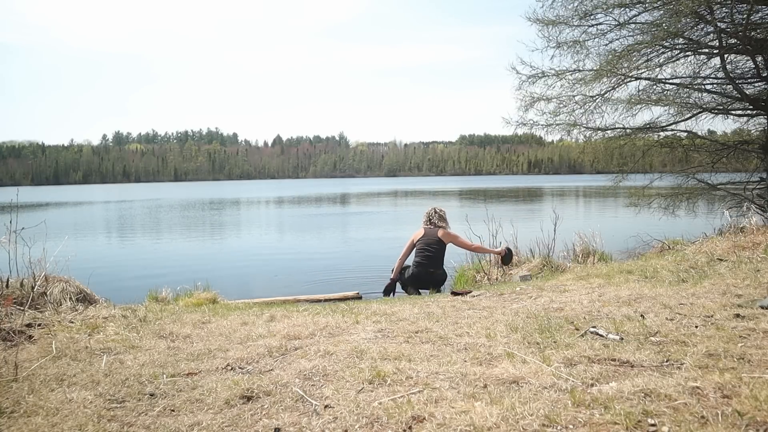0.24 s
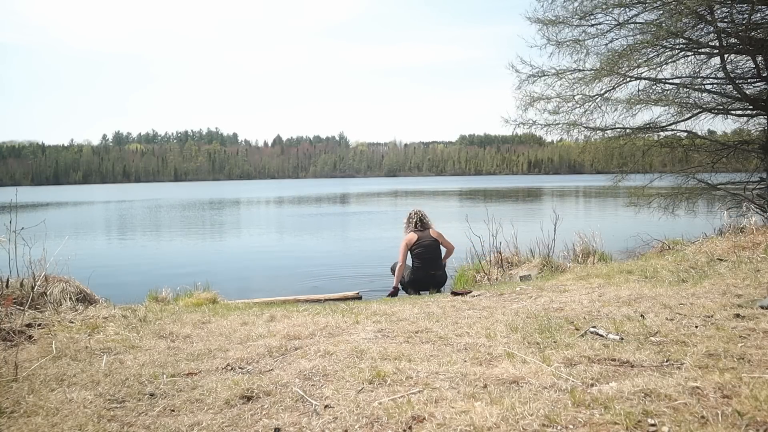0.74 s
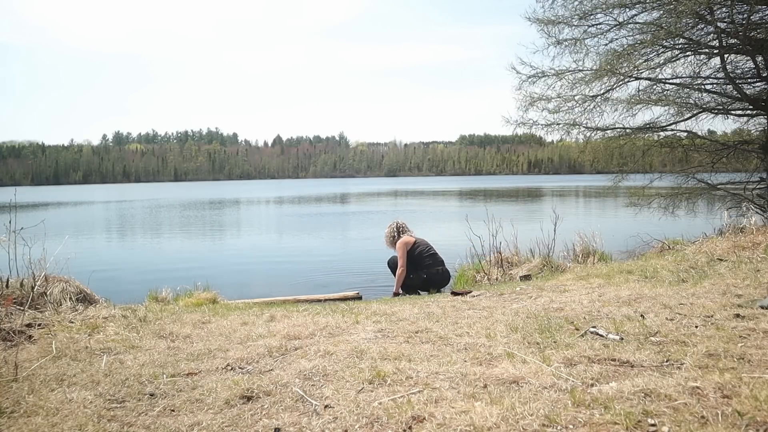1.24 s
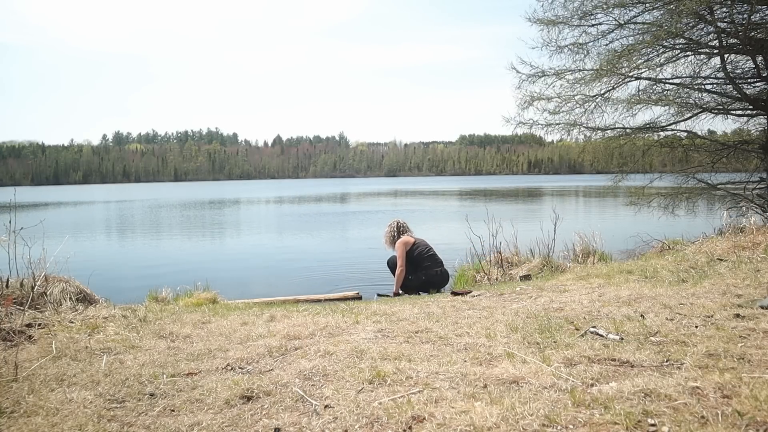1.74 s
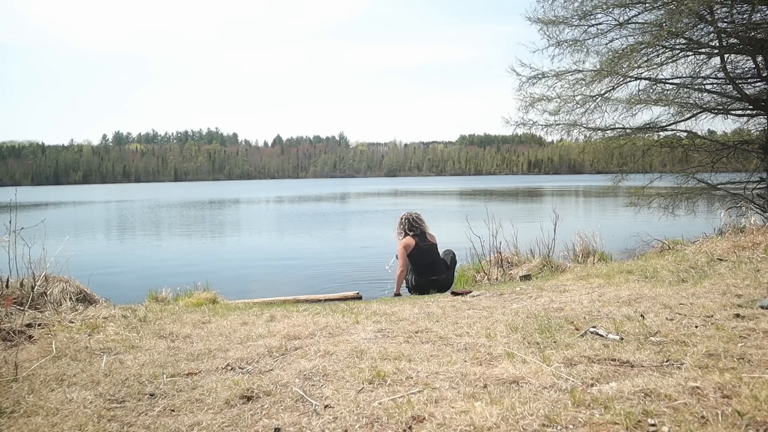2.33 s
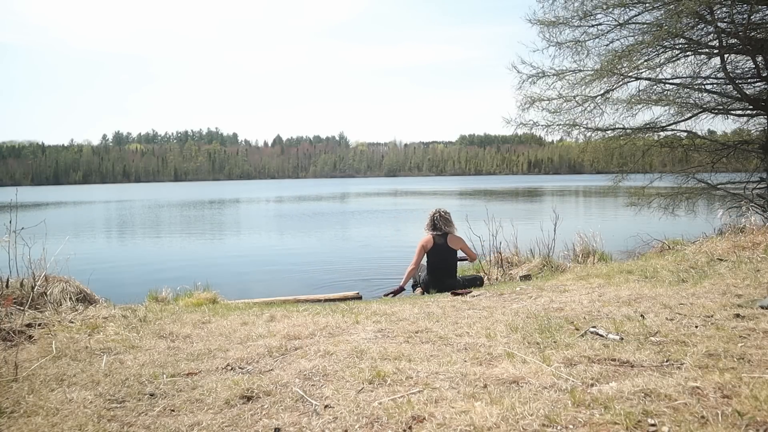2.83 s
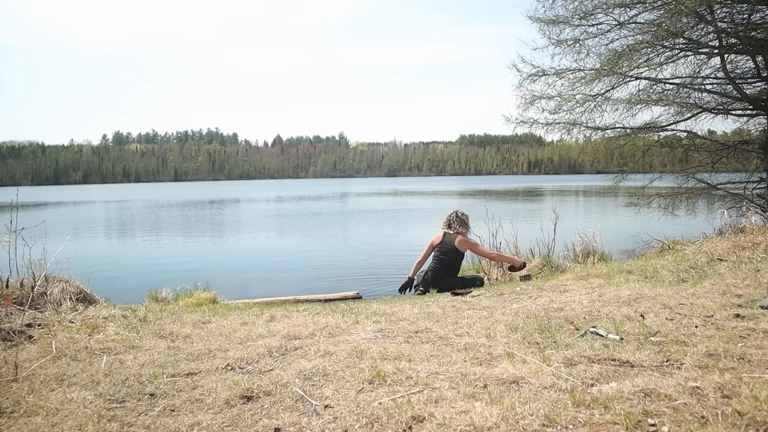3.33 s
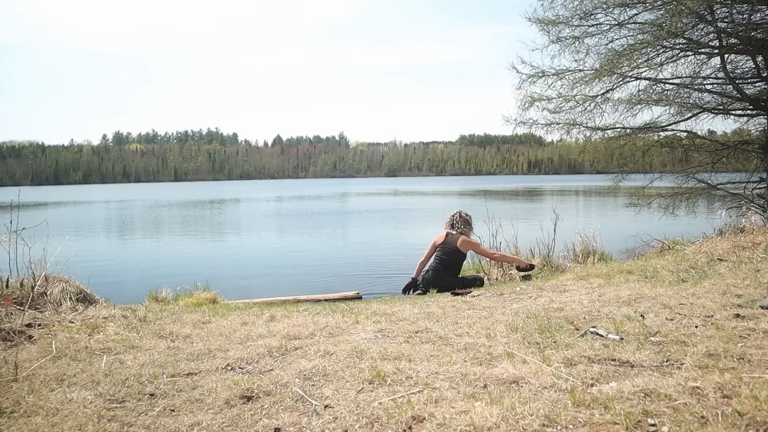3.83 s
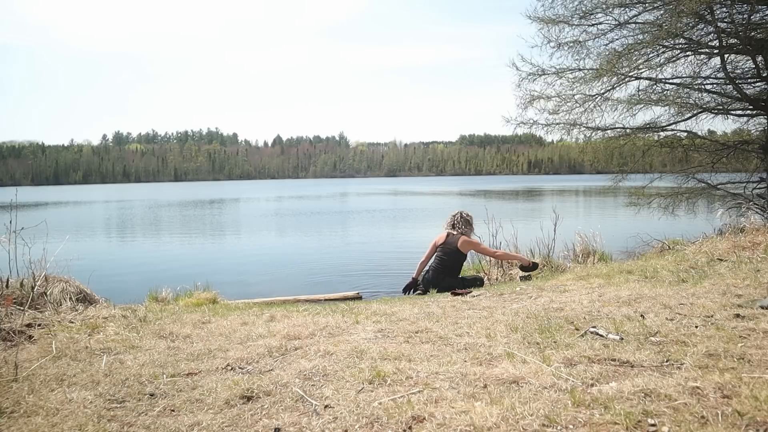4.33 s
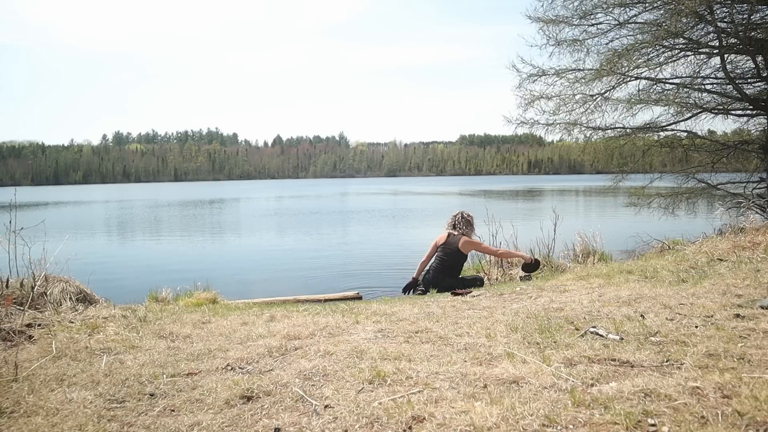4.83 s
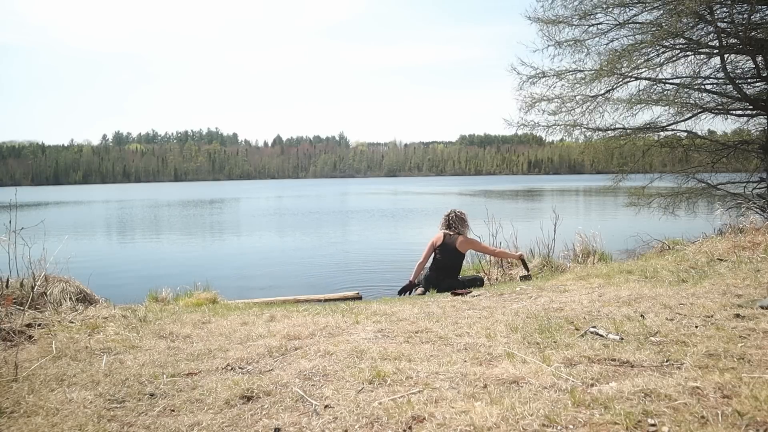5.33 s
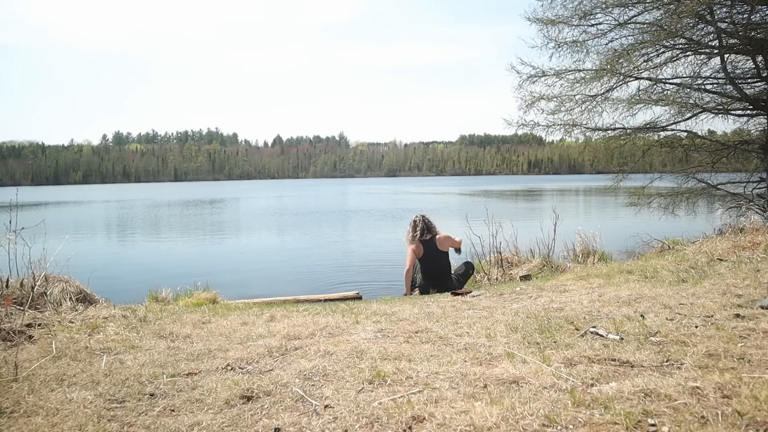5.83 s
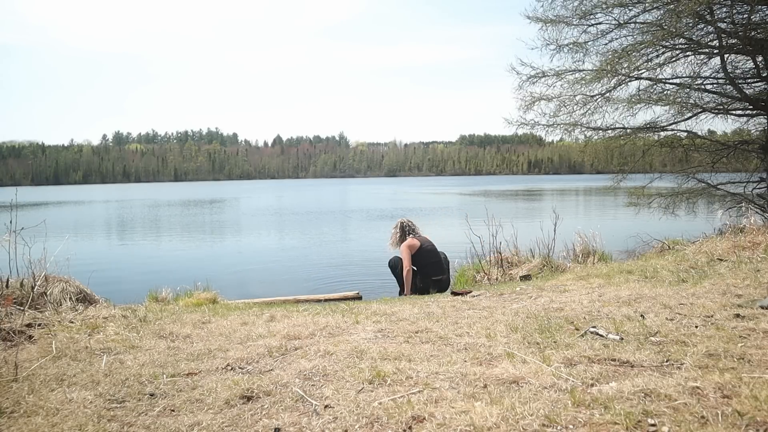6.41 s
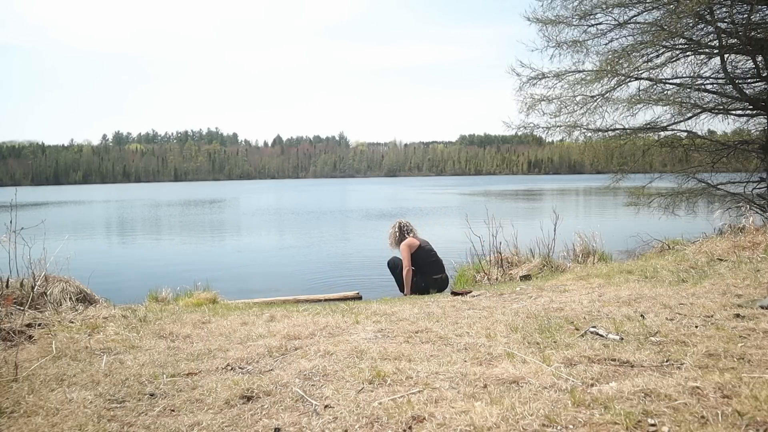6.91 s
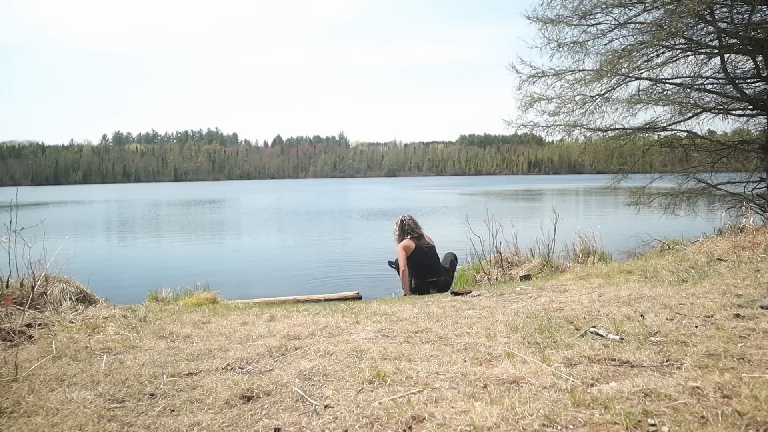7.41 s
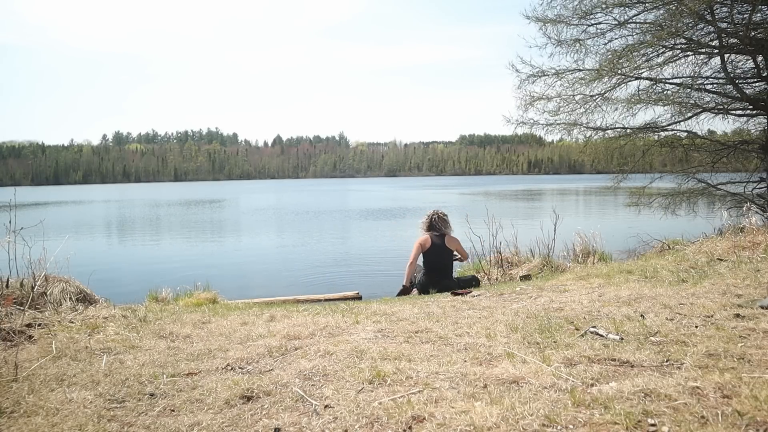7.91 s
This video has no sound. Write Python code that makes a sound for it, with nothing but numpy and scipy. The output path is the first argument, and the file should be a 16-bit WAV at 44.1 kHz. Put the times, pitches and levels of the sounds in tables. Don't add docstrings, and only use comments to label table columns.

```python
import sys
import numpy as np
from scipy import signal
from scipy.fft import rfft, irfft
from scipy.io import wavfile
from scipy.ndimage import uniform_filter1d

SR = 44100
rng = np.random.default_rng(int(sys.argv[2]) if len(sys.argv) > 2 else 0)


def generate_wav(sig):
    pcm = np.round(np.clip(np.atleast_2d(sig).T, -1, 1) * 32767).astype(np.int16)
    wavfile.write(sys.argv[1], SR, pcm)


def elevation(decibels):
    levels = np.asarray(decibels, float)
    return 10 ** (levels / 20)


N = 359855

# time in seconds, chorus level in dB, chorus centre in Hz,
# pulses per second of the near toad, near toad level in dB.
CHORUS = [(0.0, -32, 1739, 56, -5), (0.59, -34, 1737, 53.3, -4.5), (1.3, -34.5, 1722, 56.5, -4.5),
          (1.55, -33, 1726, 55.3, -4), (2.41, -33.5, 1679, 53.5, -2), (2.9, -34, 1697, 53.3, -5),
          (3.82, -33, 1689, 54, -4.5), (4.1, -34, 1699, 51.3, -4), (4.55, -33.5, 1688, 55, -3.5),
          (5.41, -37.5, 1720, 55.7, -2.5), (6.8, -36.5, 1692, 55.4, 0), (7.9, -37.5, 1702, 54.5, 0.2),
          (8.02, -41.5, 1722, 51, 1), (8.16, -37, 1726, 51, -1)]
# time in seconds, level in dB.
DEEP_TOAD = [
    (0, -59),
    (5.7, -47),
    (5.85, -14),
    (6.8, -16.5),
    (7.6, -13),
    (8.16, -11),
]
CROWD = [(.905, 51.16), (.93, 54.52), (.95, 57.38), (.98, 53.05),
         (1.005, 56.48), (1.03, 51.94), (1.055, 58.92), (1.075, 50.05)]
# time in seconds, level in dB.
GUSTS = [(0.0, -47), (0.5, -46), (0.93, -54), (1.2, -49), (1.4, -42.5), (1.85, -38.5), (2.1, -41),
         (2.38, -42.5), (2.75, -37), (3.3, -44.5), (3.66, -64), (4.5, -66), (5.0, -52), (5.75, -45.5),
         (6.1, -40.5), (6.9, -35), (7.6, -33), (8.16, -31.5)]
# time in seconds, change in dB.
PUFFS = [(2.04, 4), (2.46, 6.5), (5.47, 6), (5.88, 5), (6.01, 3.5), (6.7, 6.5), (7.11, -3), (7.18, 5.5),
         (7.42, -4.5), (7.66, 3.5), (7.79, 3), (7.91, -10)]
# frequency in Hz, density in dB per Hz.
BUFFET_SPECTRUM = [(7.1, -27), (12, -0.5), (33, 1.5), (82, -5), (200, -18.5), (336, -34.5), (378, -35.5),
                   (420, -40.5), (550, -58), (920, -120)]
# frequency in Hz, density in dB per Hz.
AIR_SPECTRUM = [(71, -51), (120, -20), (294, -18.5), (450, -18.5), (552, -22), (1130, -26.5), (1730, -7),
                (1830, -10.5), (1990, -29), (2250, -33), (3660, -36), (12200, -40), (15500, -41)]
# peak in seconds, level in dB, seconds to fade 20 dB, # dull part in dB,
# dull resonance in Hz.
PUSHES = [(0.0, -47, 0.42, -4.5, 2840), (0.2, -55, 2.8, -0.7, 2900), (1.2, -65, 0.7, -1, 2930),
          (1.91, -67, .5, 7, 2600), (2.1, -65, 0.5, 2.5, 2600), (2.3, -60, 0.5, -1, 2650),
          (2.61, -62, 0.1, 0, 2520), (2.71, -66, 0.6, 14, 2490), (2.85, -66, 0, 2.5, 2600),
          (3.13, -57, 0.24, -4, 2990), (3.45, -65, 1, -2.5, 2950), (3.6, -46.5, 0.26, -6, 3400),
          (3.67, -50.5, 0.2, -2, 3600), (3.75, -56, .4, -2, 3500), (3.82, -46, 0.34, -6, 3700),
          (3.89, -42, 0.33, -4.5, 3600), (4.2, -52.5, 1.55, 0.8, 3800), (4.46, -52.5, .9, -4, 3500),
          (4.6, -47, .3, 1, 2600), (4.72, -51.5, .45, 2.5, 2480), (4.86, -57.5, 0.2, 10.5, 2350),
          (4.96, -55.5, 0, -2.5, 2388)]
# time in seconds, frequency in Hz.
BRIGHT = [(0, 8100), (3.55, 8100), (3.7, 8300), (3.86, 8500), (4.03, 7100), (4.3, 7200), (4.45, 7500),
          (4.6, 7700), (4.9, 7000)]
# time in seconds, frequency in Hz, level in dB.
MIDDLE = [
    (3.95, 5300, -18),
    (4.12, 5350, 1),
    (4.4, 5400, -6),
    (4.55, 6003, -9),
    (4.7, 6100, -2),
    (4.85, 6000, -20),
]
# seconds at which it opens, is full, begins to close, is shut.
GAP_S = (3.9, 4.05, 4.75, 4.9)
# time in seconds, added level in dB.
LOW_BOOST = [(1.9, 8), (2.1, 1), (3.5, 0.2), (3.7, 2.4), (4.3, 2.5), (4.5, 0.5)]
# time in seconds, peak in dB.
TICKS = [(0.0792, -34), (1.236, -39), (1.798, -44), (2.1281, -45), (2.15, -42.5), (2.3371, -42),
         (2.4264, -44.5), (2.4768, -45), (2.5227, -48), (2.572, -41), (2.9662, -47), (3.0021, -48),
         (3.235, -48), (3.3326, -49), (2.616, -41), (2.6509, -43), (2.6831, -40), (2.832, -46.5),
         (3.0325, -45), (3.1148, -43), (3.3024, -45), (3.4544, -44), (3.5627, -46), (3.6391, -36),
         (3.6681, -34), (3.679, -38), (3.718, -41), (3.758, -42), (3.797, -34), (4.2018, -40),
         (4.4298, -38), (4.8214, -46), (4.9496, -46), (4.8635, -41.5), (6.0152, -46), (6.0355, -44),
         (6.0939, -43), (7.378, -45.5)]
# seconds at which they begin, are full, begin to fade, end.
STRAY_S = (1.9, 2.1, 3.45, 3.55)
# time in seconds, peak in dB.
RASP = [(0.7942, -34.5), (0.878, -37), (0.9244, -41), (0.9454, -34.5), (1.0469, -39), (1.0761, -40),
        (1.0911, -37), (1.1265, -39), (1.1669, -39), (1.2332, -37.5), (1.2736, -42.5), (1.3051, -43),
        (1.3574, -41), (1.4178, -39.5), (1.43, -35.5), (1.5076, -38)]
# time in seconds, level in dB, start in Hz, end in Hz, length in seconds.
BUBBLES = [(.783, -43, 560, 640, .007), (.784, -46, 390, 420, .01), (1.223, -48, 319, 430, 0.041),
           (1.688, -48, 720, 950, .014), (2.028, -44, 1050, 1250, .008), (2.656, -44, 700, 760, .012),
           (7.243, -46, 700, 740, .01), (6.846, -42, 1020, 1270, .02), (1.361, -45, 207, 262, .04),
           (1.425, -42.5, 640, 720, .014), (1.5, -47, 600, 800, .03), (1.575, -46.5, 760, 900, .011),
           (1.748, -40, 960, 680, 0.019), (1.846, -40.5, 400, 540, .026), (1.865, -38, 520, 630, .026),
           (2.089, -44, 950, 1103, .007), (2.654, -38.5, 960, 1120, 0.01), (2.699, -48, 810, 1100, .025),
           (2.719, -45, 1160, 1302, .033), (6.653, -50, 879, 920, 0.048), (6.655, -45, 440, 464, .018),
           (6.786, -48, 560, 480, .014), (6.796, -35.5, 440, 1230, .046), (6.80, -42, 355, 416, .029),
           (6.826, -41, 450, 950, .022), (7.152, -41, 198.2, 284.1, .046), (7.311, -46, 950, 1000, .006),
           (7.313, -37, 606, 660, 0.028), (7.329, -41, 660, 800, .016), (7.347, -39, 558, 595, .034),
           (7.375, -49, 760, 820, .012), (6.912, -47, 880, 905, .012), (6.915, -51, 560, 680, .025),
           (7.608, -39, 998, 1200, .011), (7.619, -41, 626, 701, .011), (7.69, -44, 1170, 1252, .013)]
# time in seconds, peak in dB, ring in Hz.
DRIPS = [(1.3663, -43, 2760), (1.8138, -42, 2680), (1.8476, -49, 2240), (1.9456, -43, 2491),
         (2.0379, -41, 3150), (2.244, -42, 2600), (2.5915, -38, 2310), (2.6217, -44, 2330),
         (2.7535, -38, 2399), (2.571, -50, 3300), (2.629, -44, 2700), (2.644, -44, 2400),
         (2.652, -40, 4100), (2.696, -42, 2400), (2.702, -47, 4200), (2.7274, -43, 2650),
         (2.733, -46, 3200), (2.742, -40, 3620), (7.2376, -49, 3300), (7.2701, -45, 3900),
         (7.304, -47, 5000), (7.331, -49, 4300), (7.349, -50, 3430), (7.379, -49, 4890),
         (7.4317, -51, 3450), (7.5694, -50, 3600), (7.6352, -36, 5600), (7.667, -47, 3300),
         (7.676, -47, 3700), (7.692, -47, 3900), (7.725, -43, 2700), (7.754, -46, 2900),
         (7.7874, -48, 2400), (3.6002, -52, 2819), (3.807, -41, 3430), (4.8486, -38, 2626),
         (4.865, -29, 2460), (5.0916, -45, 2380), (5.385, -48, 2579), (6.8014, -53, 2448),
         (6.9627, -36, 2240), (7.034, -51, 2590), (7.1601, -53, 3110), (7.2145, -51, 2244),
         (7.639, -34, 2446), (7.7129, -35, 2470)]
# start in seconds, peak in seconds, end in seconds, peak in dB.
SPLASHES = [
    (1.9, 1.942, 2.0, -53.5),
    (1.99, 2.03, 2.15, -60),
    (2.6, 2.7, 2.79, -52.5),
    (5.04, 5.1, 5.24, -60),
    (6.93, 6.961, 7.18, -61.5),
    (7.19, 7.3, 7.42, -58),
    (7.596, 7.66, 7.86, -55),
]
# start in seconds, peak in seconds, end in seconds, peak in dB.
TRICKLES = [
    (1.5, 1.92, 2.12, -55),
    (2.67, 2.71, 2.77, -54),
    (4.75, 4.86, 5.0, -46),
    (5.0, 5.25, 6.0, -51),
]
# frequency in Hz, level in dB, 60 dB decay time in seconds.
TWIG = [(3760, -19, 0.073), (4980, -8.5, 0.031), (7397, -6.5, 0.036), (8100, -6, 0.066), (8750, 0, 0.018),
        (9383, -31, 5.0), (11600, -22, 0.048)]


def evened(x):
    return x / np.sqrt(np.mean(x ** 2) + 1e-20)


def curves(rows):
    s, *columns = np.transpose(rows)
    return [np.interp(np.arange(N) / SR, s, c) for c in columns]


def add(mix, s, sound):
    part = mix[round(s * SR):][:len(sound)]
    part += sound[:len(part)]


def band(x, low_hz, high_hz, order=2):
    return signal.sosfilt(signal.butter(order, [low_hz, high_hz], "bandpass", fs=SR, output="sos"), x)


def coloured(points):
    f, db = np.transpose(points)
    hz = np.fft.rfftfreq(N, 1 / SR)
    gain = elevation(np.interp(np.log(hz + 1), np.log(f + 1), db))
    return irfft(rfft(rng.standard_normal(N)) * gain, N)


def wander(rate):
    knots = rng.standard_normal(4000)
    return np.interp(np.arange(N) * rate / SR, np.arange(len(knots)), knots)


def crackle(per_s, spread_db):
    size = elevation(spread_db * np.minimum(rng.exponential(1, N), 4)) * np.sign(rng.standard_normal(N))
    return evened(size * (rng.random(N) < per_s / SR))


def ring(hz, t60, rise=0.00056, size=900):
    t = np.arange(size) / SR
    return np.sin(2 * np.pi * hz * t) * elevation(-60 * t / t60) * np.minimum(t / rise, 1)


def trill(hz, per_s, duty, glide):
    place = (np.cumsum(per_s * (1 + .014 * wander(9))) / SR + rng.random()) % 1 - .5
    width = np.where(place < 0, 0.99 * duty, duty)
    pulse = np.exp(-.5 * (place / width) ** 2)
    pulse += 0.11 * np.exp(-.5 * ((place + duty) / 0.023) ** 2)
    pulse *= elevation(2.78 * wander(40))
    pitch = hz * (1 + glide * place + .016 * wander(45))
    return evened(pulse * np.sin(2 * np.pi * np.cumsum(pitch) / SR))


def shore_echo(x, t60):
    t = np.arange(SR // 2) / SR
    tail = rng.standard_normal(len(t)) * elevation(-60 * t / t60)
    return signal.fftconvolve(x, tail / np.linalg.norm(tail))[:N]


def toads():
    level_db, centre_hz, per_s, near_db = curves(CHORUS)
    steady = np.ones(N)
    high_db = -13.5 - 1.7 * np.arange(N) / SR + 1.2 * wander(2.52)
    near = elevation(near_db) * trill(1.015 * centre_hz, per_s, duty=0.12, glide=0.03)
    high = elevation(high_db) * trill(1880 * steady, 58 * steady, duty=0.13, glide=.05)
    deep = elevation(curves(DEEP_TOAD)[0]) * trill(1370 * steady, 52 * steady, duty=0.088, glide=0.15)
    crowd = np.zeros(N)
    for pitch, pace in CROWD:
        voice = trill(centre_hz * pitch, pace * steady, duty=0.13, glide=0.058)
        crowd += elevation(1.26 * wander(1.524)) * voice
    overtone = elevation(-30.5) * trill(2080 * steady, per_s, duty=0.1, glide=.05)
    direct = near + overtone + high + deep + elevation(-3) * evened(crowd)
    wet = direct + elevation(-10.5) * shore_echo(direct, t60=0.32)
    return elevation(level_db) * wet / np.sqrt(uniform_filter1d(wet ** 2, SR // 3))


def wind():
    t = np.arange(N) / SR
    puff_s = 0.036
    gust_db = curves(GUSTS)[0]
    for s, db in PUFFS:
        gust_db += db * np.exp(-.5 * ((t - s) / puff_s) ** 2)
    buffet = evened(coloured(BUFFET_SPECTRUM))
    deepest = signal.sosfiltfilt(signal.butter(2, 45, fs=SR, output="sos"), buffet)
    lull = elevation(1.3 * np.minimum(gust_db + 46, 0))
    upper = np.clip((gust_db + 38) / 25, 0, 0.22) * band(buffet, 112, 270)
    return elevation(gust_db + 0.54 * wander(18)) * (buffet - (1 - lull) * deepest + upper)


def air():
    x = coloured(AIR_SPECTRUM)
    return elevation(-54) * x / np.std(band(x, 2158, 18000, order=4))


def pushes(t):
    s, db, fade_s, dull_db, dull_hz = np.transpose(PUSHES)[:, :, None]
    rise_share = 0.32
    away = np.where(t < s, (s - t) / rise_share, t - s)
    power = elevation(db - 20 * away / fade_s) ** 2 + 1e-20
    total = power.sum(0)
    return 10 * np.log10(total), (power * dull_db).sum(0) / total, (power * dull_hz).sum(0) / total


def cloth():
    rub = rng.standard_normal(N) + 0.36 * crackle(1500, spread_db=3.5)
    hz, t, z = signal.stft(rub, SR, nperseg=512, noverlap=384)
    hz = hz[:, None]

    def hump(centre_hz, width_hz):
        return np.exp(-.5 * ((hz - centre_hz) / width_hz) ** 2)

    level_db, dull_db, dull_hz = pushes(t)
    thin_db = -3.5 - 0.31 * dull_db - np.interp(t, [4.6, 4.8], [0, 5])
    low_db = 0.75 + 0.69 * dull_db + np.interp(t, *np.transpose(LOW_BOOST))
    bright_hz = np.interp(t, *np.transpose(BRIGHT))
    s, middle_hz, middle_db = np.transpose(MIDDLE)

    edge_hz = np.interp(t, [3.95, 4.1, 4.5, 4.65], [9770, 10500, 10300, 9600])
    under_edge = 1 / (1 + np.exp((hz - edge_hz) / 200))
    bright = (0.37 * hump(bright_hz, 1050) + 0.54 * hump(8100, 5200)) * (0.47 + under_edge)
    under_dull_edge = 1 / (1 + np.exp((hz - dull_hz - 700) / 120))
    dull = (0.56 * hump(dull_hz, 690) + 0.68 * hump(2700, 3200)) * (0.94 + under_dull_edge)
    dull = elevation(dull_db - 2.5) * dull
    thin = elevation(thin_db - 1) * hump(13800, 3800)
    low = elevation(low_db + 7) * hump(930, 560) * (hz > 200)
    middle = elevation(np.interp(t, s, middle_db)) * hump(np.interp(t, s, middle_hz), 350)
    gap = elevation(-4.5 * hump(4600, 220.3) * np.interp(t, GAP_S, [0, 1, 1, 0]))

    patches = rng.standard_normal((len(t), len(hz))).T
    patches = uniform_filter1d(patches, size=7, axis=0)
    patches = evened(uniform_filter1d(patches, size=22, axis=1))
    body = np.sqrt(bright ** 2 + dull ** 2 + thin ** 2 + low ** 2 + middle ** 2)
    shape = gap * body * elevation(level_db + 5 + patches)
    rustle = signal.istft(z * shape, SR, nperseg=512, noverlap=384)[1][:N]
    ending = np.clip((5.06 - np.arange(N) / SR) / 0.062, 0, 1)
    return rustle * elevation(0.8 * wander(40)) * ending


def ticks():
    out, t = np.zeros(N), np.arange(1500) / SR
    for s, db in TICKS:
        burst = rng.standard_normal(len(t)) * elevation(-60 * t / 0.017) * np.minimum(t / .0006, 1)
        bright = 2 * band(burst, 6500, 9400, order=1)
        dull = 2 * elevation(-19) * band(burst, 2200, 5500)
        add(out, s, elevation(db - 2.5) * (bright + dull))
    stray = crackle(25, spread_db=3) * np.interp(np.arange(N) / SR, STRAY_S, [0, 1, 1, 0])
    snap = band(burst, 6300, 11500, order=1)
    return out + elevation(-79.5) * signal.oaconvolve(stray, snap)[:N]


def insect():
    out = np.zeros(N)
    for (s, db), detune in zip(RASP, rng.uniform(-0.025, 0.022, len(RASP))):
        add(out, s, elevation(db - 1) * ring(5270 * (1 + detune), t60=0.015, rise=0.00046))
    faint = crackle(350, spread_db=3.5) + 0.35 * rng.standard_normal(N)
    faint *= np.interp(np.arange(N) / SR, [.62, .92, 1.35, 1.68], [0, 1, 1, 0])
    return out + elevation(-46) * band(faint, 5000, 5480)


def bubbles():
    out = np.zeros(N)
    for s, db, start_hz, end_hz, length in BUBBLES:
        rise = np.clip(0.085 + .9 * np.log2(end_hz / start_hz), 0.06, 0.45)
        u = np.arange(int(1.2 * length * SR)) / (length * SR)
        pitch = start_hz + (end_hz - start_hz) * np.minimum(u, 1.05) ** 1.16
        pitch *= 1 + 0.022 * np.sin(2 * np.pi * 70 * length * u)
        swell = np.minimum(u / rise, 1) ** 1.1 * np.exp(-1.5 * np.maximum(u - rise, 0))
        swell *= np.clip((1.3 - u) / 0.17, 0, 1)
        rough = 1 + 1.2 * uniform_filter1d(rng.standard_normal(len(u)), size=60)
        add(out, s, elevation(db + 2.5) * swell * rough * np.sin(2 * np.pi * np.cumsum(pitch) / SR))
    return out


def drips():
    out, t = np.zeros(N), np.arange(900) / SR
    for s, db, hz in DRIPS:
        slap = band(rng.standard_normal(len(t)), 0.58 * hz, 1.25 * hz) * elevation(-60 * t / 0.026)
        level_db = 0.56 * db - 17 - 6.8 * np.log2(hz / 2500)
        add(out, s, elevation(level_db) * (0.7 * ring(hz, t60=0.015, rise=0.00046) + 1.9 * slap))
    return out


def splashes():
    out, swarm = np.zeros(N), np.zeros(N)
    for hz in np.geomspace(800, 4400, 24):
        bubble = ring(hz, 18 / hz, .0004, size=1800)
        swarm += signal.oaconvolve(crackle(90, spread_db=3), bubble)[:N] * (hz / 2500) ** 0.18
    spray = rng.standard_normal(N) + 0.8 * crackle(400, spread_db=4)
    spray = evened(band(spray, 940, 7500, order=1))
    splash = evened(swarm) + 0.31 * spray
    splash = splash / np.std(band(splash, 1920, 5200, order=4))
    gurgle = evened(band(swarm + 3.5 * spray * np.std(swarm), 640, 1330))
    for sound, table in [(splash, SPLASHES), (gurgle, TRICKLES)]:
        for start, peak, end, db in table:
            span = slice(round(start * SR), round(end * SR))
            swell_db = curves([(start, -10), (peak, 0), (end, -10)])[0][span]
            fade = signal.windows.tukey(span.stop - span.start, 0.15)
            add(out, start, elevation(db + swell_db) * sound[span] * fade)
    return out


def twig():
    out, t = np.zeros(N), np.arange(1500) / SR
    snap_s, snap_db, longest_ring_s = 5.3855, -35, .03
    crack = band(rng.standard_normal(len(t)), 2000, 15500) * elevation(-60 * t / 0.05)
    add(out, snap_s, elevation(snap_db - 3.5) * crack)
    for hz, db, t60 in TWIG:
        add(out, snap_s, elevation(snap_db + db + 4) * ring(hz, min(t60, longest_ring_s), size=2400))
    return out


def scene():
    shore = bubbles() + drips() + splashes()
    return (toads() + wind() + air() + cloth() + ticks() + insect() + shore + twig())[None]


def roll_off(x):
    return signal.sosfilt(signal.butter(12, 15690, fs=SR, output="sos"), x)


def record(dry):
    edge = signal.firwin(401, 15740, window=("kaiser", 9), fs=SR)
    mix = signal.oaconvolve(dry, edge[None], "same")
    return roll_off(mix)


dry = scene()
out = record(dry)
generate_wav(out)
```